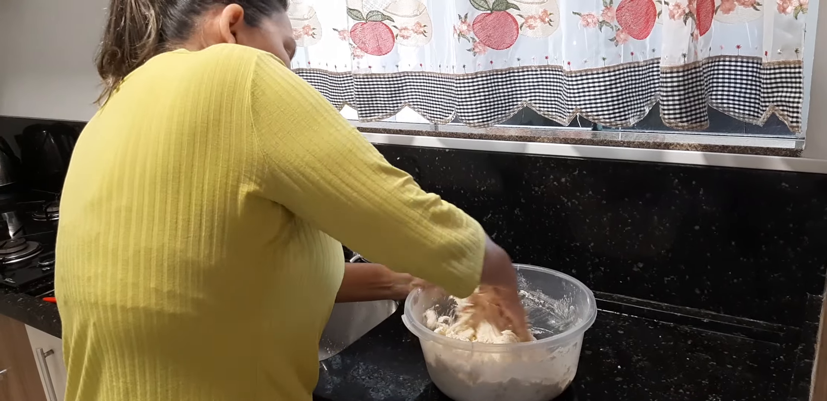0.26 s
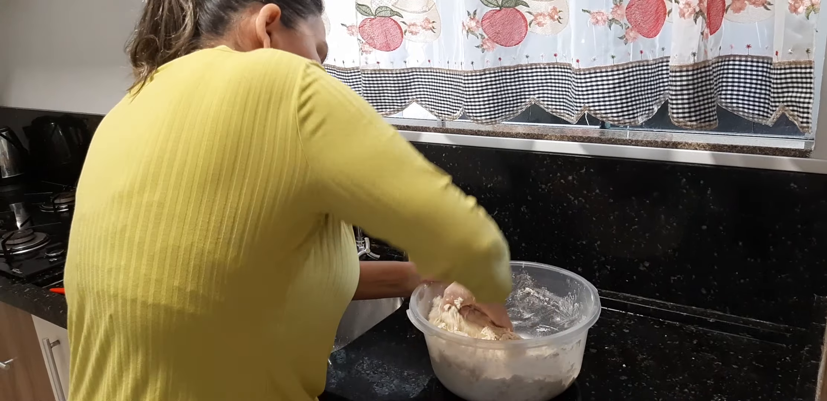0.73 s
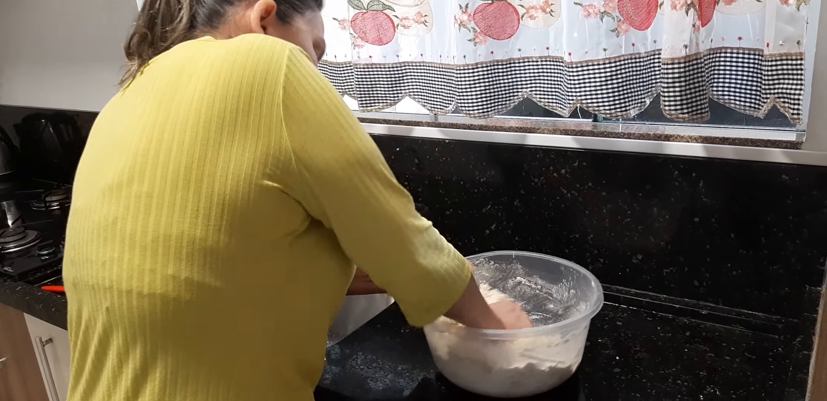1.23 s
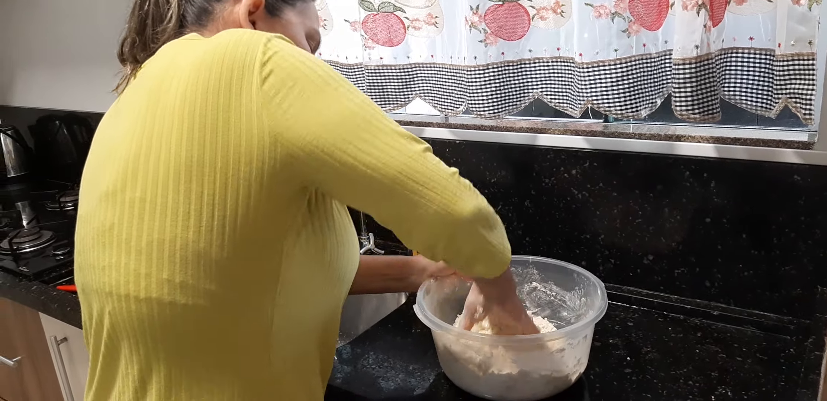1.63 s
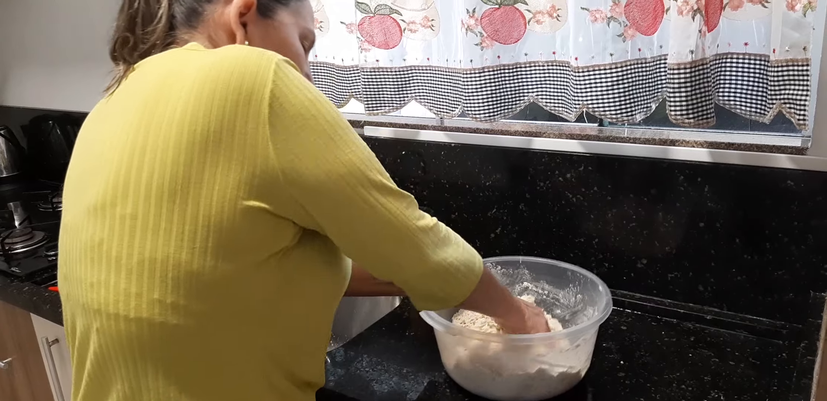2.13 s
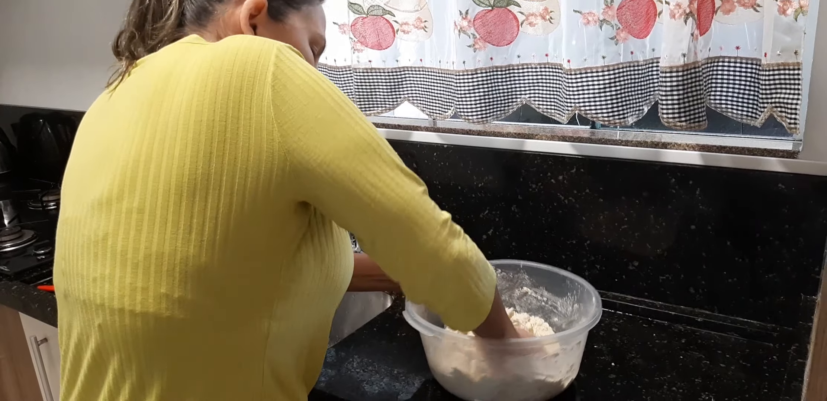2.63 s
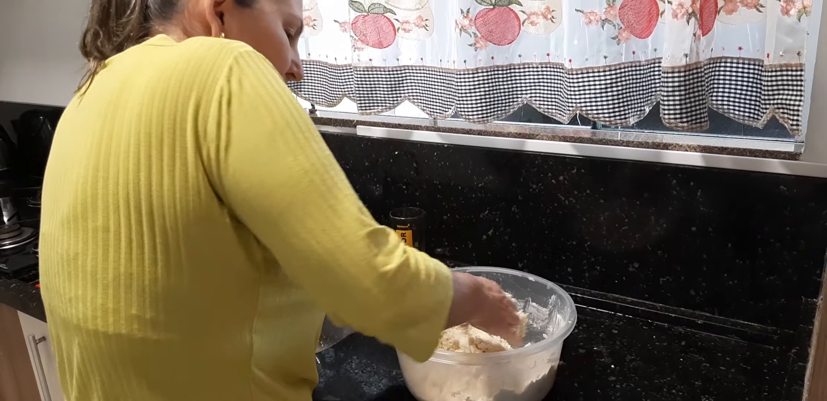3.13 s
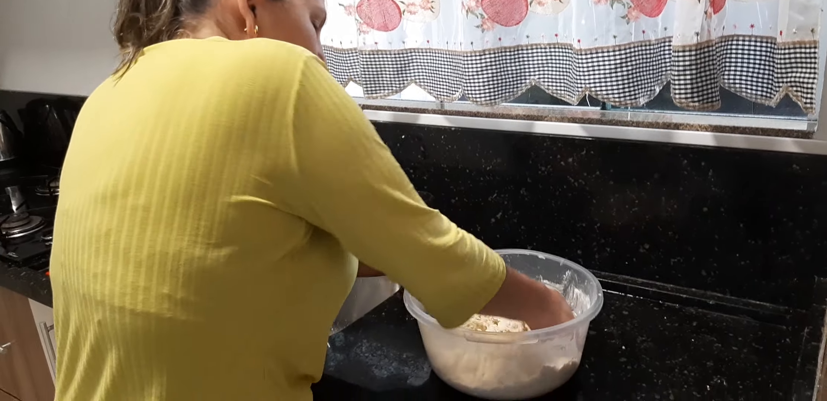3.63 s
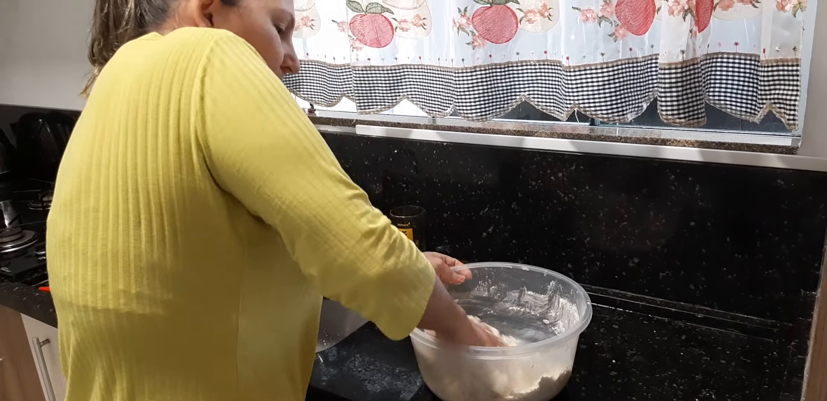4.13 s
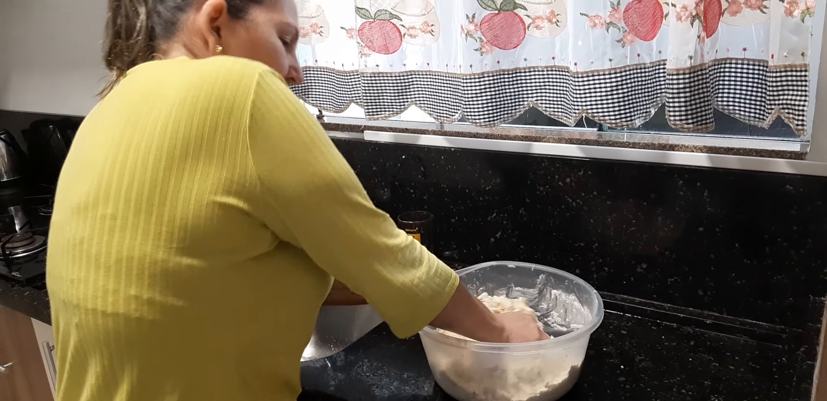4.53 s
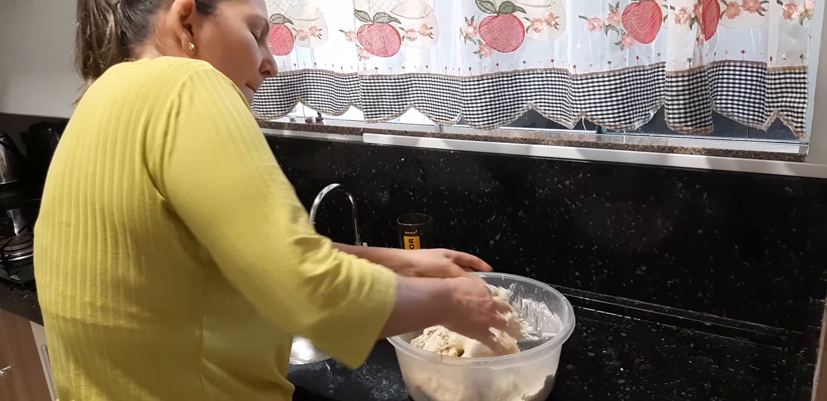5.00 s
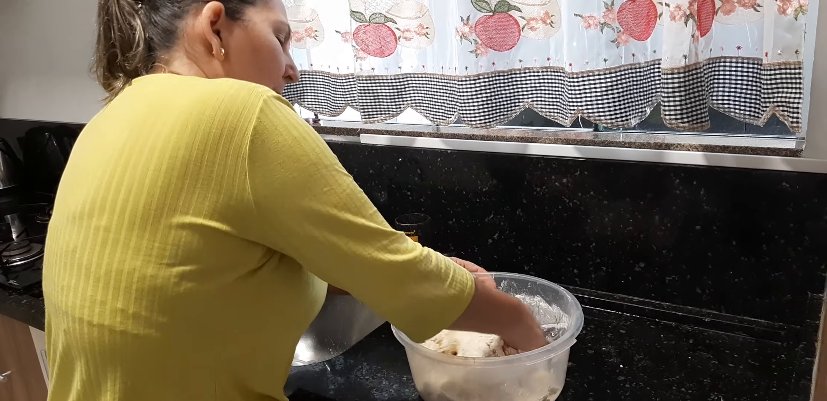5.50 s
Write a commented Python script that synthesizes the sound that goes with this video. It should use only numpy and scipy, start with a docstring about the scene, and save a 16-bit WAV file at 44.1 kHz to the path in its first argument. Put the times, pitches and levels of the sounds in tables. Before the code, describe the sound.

Crumbly dough is rubbed and pressed in a plastic bowl in irregular gritty strokes, some dull, some bright and hissing. Knuckles and lumps tap the wall now and then, with the sharpest clatter just after five seconds. A small home kitchen gives short echoes; low rumble, faint hum and hiss lie beneath. Close stereo microphone, treble leaning left.

```python
"""A dense gritty hiss comes and goes as hands knead crumbly dough in a plastic bowl in a quiet kitchen.
Each stroke drags crumbs along the wall: showers of random slips, shaped by hand pressure and speed.
Knuckles and lumps knock the bowl now and then, each a crack and some decaying modes; a few high ticks ring.
Behind it: shaped noise for the room's rumble and hiss, a mains hum and one thin whine, as wavering sines.
A close pair of microphone ports hears it all, with short echoes from the kitchen."""
import sys
import numpy as np
from scipy import signal
from scipy.fft import rfft, irfft, next_fast_len
from scipy.io import wavfile
from scipy.ndimage import uniform_filter1d

SR = 44100
rng = np.random.default_rng(int(sys.argv[2]) if len(sys.argv) > 2 else 0)


def output_pcm(signal):
    """Save a mono or channel-first signal as 16-bit PCM at the path in sys.argv[1].

    Samples are clipped to [-1, 1] before scaling.
    """
    pcm = np.clip(np.atleast_2d(signal).T, -1, 1) * 32767
    wavfile.write(sys.argv[1], SR, np.round(pcm).astype(np.int16))


def convert_level_to_amplitude(level_db):
    """Map a level in decibels to its linear amplitude factor."""
    exponent = np.asarray(level_db, float) / 20
    return 10 ** exponent


N = 253883  # samples

# Strokes of the hand, dull pushes and fast bright sweeps:
# (full pressure at [s], rise [s], hold [s], fall [s], pressure [dB], speed as extra flour level [dB])
HAND_STROKES = [(0, .1, 0.015, .15, -50.5, -6), (0.126, .1, .01, 0.31, -61, -12),
                (0.313, .03, 0.018, .1, -74, 6), (0.392, .01, .02, .1, -62, -12),
                (0.428, .04, .02, 0.14, -54.5, -8), (0.554, 0.17, 0.06, 0.23, -49.5, 1.5),
                (0.72, 0.092, .01, 0.88, -59, -9), (1.12, 0.23, 0.089, .1, -52.5, 1.5),
                (1.223, 0.16, 0.086, 0.074, -46.5, -4.5), (1.368, .1, .11, 0.19, -53, -13),
                (1.76, 0.094, 0.087, .1, -65.5, -6), (1.93, 0.13, 0.034, 0.088, -57.5, 5.5),
                (1.974, 0.086, 0.032, 0.11, -49.5, -7), (2.045, 0.12, 0.033, 0.14, -48, -4.5),
                (2.15, .1, 0.13, 0.29, -57, -8.5), (2.48, .3, 0.068, 0.16, -61.5, -10),
                (2.689, 0.086, 0.23, .2, -51.5, -10), (3.03, 0.26, 0.074, 0.18, -49, 0),
                (3.307, .012, .1, .2, -54, -17), (3.432, 0.11, 0.12, .2, -48.5, -8.5),
                (3.604, 0.35, 0.095, 0.18, -45.5, -0.5), (3.754, 0.15, 0.032, 0.29, -43, -3),
                (3.94, 0.15, 0.04, 0.56, -56, -11), (4.245, 0.48, .05, .1, -57.5, -7),
                (4.352, 0.084, 0.067, 0.27, -49, -0.5), (4.42, 0.21, .2, 0.27, -48, -4.5),
                (4.773, 0.26, .17, 0.19, -54.5, -7), (5.152, .008, 0.049, .1, -51.5, -20),
                (5.202, 0.087, 0.14, .2, -47.5, -6.5), (5.393, 0.27, 0.093, .2, -47.5, 3),
                (5.57, .2, 0.059, 0.24, -44.5, -1)]
# Colour of crumbs on the wall: (frequency [Hz], relative level [dB])
CRUMB_COLOUR = [(1200, -22.5), (1800, -9.5), (3000, -3), (4200, -1), (5500, -4.5), (7000, -9), (7800, -15),
                (9000, -65)]
# Colour of fine flour: (frequency [Hz], relative level [dB])
FLOUR_COLOUR = [(4000, -13), (5500, 9), (7000, 8.5), (7700, 1), (8500, 0.5), (10000, -0.5), (12000, 6),
                (13500, 3.5), (14500, 3.5), (16000, -0.5)]
# Colour of the bowl shaken on the counter: (frequency [Hz], relative level [dB])
BOWL_COLOUR = [(120, -20), (250, -7), (450, -1), (750, -8), (1300, -2), (1800, -4.5), (2500, -54)]
# Colour of the wall's answer to dry crust: (frequency [Hz], relative level [dB])
RASP_COLOUR = [(1500, -20), (1900, -4), (2200, -1), (2450, 0), (2700, -2.5), (3100, -23.5)]

# Rumble and hiss of the room: (frequency [Hz], relative density [dB per Hz])
ROOM_RUMBLE = [(20, -34), (35, -25), (59, -1), (72, -6), (90, -10.5), (105, -15), (124, 0), (174, -2.5),
               (295, -2), (520, -11), (700, -13.5), (1500, -24.5), (2300, -15), (3000, -26)]
# Its treble, with the broad bands of an appliance: (frequency [Hz], relative density [dB per Hz])
ROOM_TREBLE = [(3700, -21.5), (4500, -28), (6500, -31), (7200, -32), (8100, -52), (10000, -37.5),
               (11300, -27.5), (12000, -28), (12900, -33), (13400, -36), (16000, -40)]
# Standing waves and a hiss band, ahead of the port colour: (centre [Hz], width [Hz], level [dB rms])
STANDING_WAVES = [(126, 24, -71.5), (204.2, 15, -67), (286, 37, -71), (508, 14, -73.5), (3740, 180, -72)]
# Mains hum, ahead of the port colour:
# (frequency [Hz], central level [dB rms], waver [Hz], left over right [dB])
MAINS_HUM = [(58.8, -69, 1.9, 3.5), (118.5, -71.5, 3.2, 0)]
# One thin whine, ahead of the port colour:
# (frequency [Hz], central level [dB rms], waver [Hz], left over right [dB])
THIN_WHINE = (3626, -75, 1.5, 5)

# Die-away of the kitchen: (frequency [Hz], t60 [s])
KITCHEN_DECAY = [(200, 0.32), (1000, 0.39), (4000, 0.31), (12000, 0.22)]
# Reflections off counter, tiles, window: (delay [s], level [dB])
NEAR_SURFACES = [(.0085, -11), (.015, -14), (.023, -15)]
# Small high ticks and squeaks: (time [s], starting level [dB], frequency [Hz], t60 [s])
HIGH_TICKS = [(.3055, -52, 4950, 0.032), (3.583, -46, 4000, .03), (3.603, -51, 4400, 0.039),
              (3.621, -41.5, 4310, 0.052), (3.636, -48, 4210, .04)]
# Knocks on the bowl:
# (time [s], level [dB], pitch of the struck spot [Hz], lower wall [dB re knock], whole bowl [dB re knock])
BOWL_KNOCKS = [(0.388, -47.5, 2370, -4, -18), (0.424, -48.5, 2550, -11, -4), (1.134, -41, 2500, -7, -12),
               (1.262, -38.5, 2700, -12, -18), (2.531, -53.5, 2400, -3.5, 9), (2.999, -42, 2226, -12, -20),
               (3.31, -52.5, 2350, 4, -15), (3.315, -43, 2500, -6, -0.5), (3.315, -42, 2130, 1.5, -20),
               (3.326, -40, 2050, -23, -17), (3.333, -38.5, 2100, -23, -10), (3.529, -43, 2700, -4, -0.5),
               (4.047, -41.5, 2380, -13, -3.5), (4.215, -46.5, 2460, -6.5, 1.5),
               (4.793, -42, 2460, -18, -14), (5.144, -35, 2350, -16.5, -14), (5.147, -38, 2390, -10, -19),
               (5.152, -36.5, 2070, -8, -15), (5.159, -36, 1990, -16, -15), (5.188, -36.5, 1960, -12, -3.5)]
# Struck spot: (multiple of its pitch [ratio], level [dB re knock], t60 [s])
SPOT_MODES = [(1, 1, 0.024), (1.07, -20, 0.022), (1.9, -8.5, .012)]
# Lower wall: (frequency [Hz], level [dB re its share], t60 [s])
LOWER_WALL_MODES = [(1130, -5, 0.0072), (1310, 5.5, 0.019), (1530, 1, 0.026)]
# Whole bowl: (frequency [Hz], level [dB re its share], t60 [s])
WHOLE_BOWL_MODES = [(217, -18, 0.028), (404, -1.5, 0.044), (500, 3, 0.029)]

# How alike the two ports hear the rubbing, echoes and room noise: (frequency [Hz], likeness [0 to 1])
PORT_LIKENESS = [(60, 0.92), (250, 0.93), (500, 0.79), (700, 0.53), (1150, 0.42), (1600, 0.07),
                 (1900, 0.031), (2450, 0.62), (2900, 0.094), (6000, 0.017), (6700, 0.056), (7200, 0.057),
                 (16000, 0.048)]
# The ports differ in colour: (frequency [Hz], left over right [dB])
PORT_COLOUR = [(60, 0), (200, 1.5), (600, 1), (1200, 4), (2200, 0), (3000, 0.5), (4000, 5.5), (5300, 0.5),
               (6300, 3.5), (7500, 11), (9000, 10.5), (11300, 10), (12500, 5), (14000, -1), (15500, 6)]

SWING_DB = 20  # gained over the rise and lost over the fall
FIRM_DB = -48  # pressure of a firm stroke
BOWL_DB, BOWL_FOLLOWS = -8, 0.73  # bowl under a firm stroke; how far it follows the pressure
RASP_DB, RASP_FOLLOWS = -5, 0.88  # the same for the rasp of dry crust
FLOUR_STEEPER, FLOUR_LEAD_S = 1.45, 0.004  # flour rises and falls faster, and a little earlier
CRACK_DB = -9  # crack of a knock, against the lower wall's share
ROOM_DB = -56  # rms of the broad room noise, ahead of the port colour
EDGE_HZ = 15770  # top of the recorded band


def evened(x):
    """Scales to an rms of 1 over all channels."""
    return x / np.sqrt(np.mean(x ** 2) + 1e-20)


def read(points, hz):
    """Reads a curve between its points, along log frequency."""
    f, value = np.transpose(points)
    return np.interp(np.log(hz + 1), np.log(f + 1), value)


def add(mix, start_s, sound):
    """Lays a sound into the mix in place, cut off at the end."""
    part = mix[round(start_s * SR):][:len(sound)]
    part += sound[:len(part)]


def coloured(x, gain):
    """Filters by a gain given as a function of frequency."""
    size = next_fast_len(N)
    spectrum = rfft(x, size)
    return irfft(spectrum * gain(np.fft.rfftfreq(size, 1 / SR)), size)[..., :N]


def slow(per_s, channels=1):
    """Slow random drift of spread 1: noise smoothed twice over 1 / per_s seconds."""
    width = max(round(SR / per_s), 1)
    once = uniform_filter1d(rng.standard_normal((channels, N)), width)
    return evened(uniform_filter1d(once, width))


def ported(pair):
    """The right port hears a share of the left signal and a part of its own, by frequency."""
    def same(hz):
        return np.clip(read(PORT_LIKENESS, hz), 0, 1)

    def own(hz):
        return np.sqrt(1 - same(hz) ** 2)

    left = pair[0]
    right = coloured(left, same) + coloured(pair[1], own)
    return np.array([left, right])


def slopes_db(t, full_s, rise_s, hold_s, fall_s):
    """Zero while the stroke holds, falling evenly in dB before and after."""
    before = (full_s - t) / rise_s
    after = (t - full_s - hold_s) / fall_s
    return -SWING_DB * np.maximum(np.maximum(before, after), 0)


def together(levels_db):
    """Level of several overlapping strokes, added as power."""
    return 10 * np.log10(sum(convert_level_to_amplitude(db) ** 2 for db in levels_db) + 1e-12)


def stroke_levels():
    """Pressure and flour levels [dB] over time; a speed above 0 dB lifts the flour, below dulls it."""
    t = np.arange(0, N, 32) / SR
    pressure, flour = [], []
    for *shape, db, speed_db in HAND_STROKES:
        pressure.append(db + slopes_db(t, *shape))
        flour.append(db + speed_db + FLOUR_STEEPER * slopes_db(t + FLOUR_LEAD_S, *shape))
    every = np.arange(N) / SR
    return np.interp(every, t, together(pressure)), np.interp(every, t, together(flour))


def grains(spectrum, per_s, spread_db):
    """Many small slips of uneven size and random sign, coloured, at an rms of 1."""
    size_db = spread_db * np.minimum(rng.exponential(1, (2, N)), 3)
    slips = convert_level_to_amplitude(size_db) * rng.choice([-1., 1.], (2, N))
    slips = slips * (rng.random((2, N)) < per_s / SR)
    return evened(coloured(slips, lambda hz: convert_level_to_amplitude(read(spectrum, hz))))


def strokes():
    """Pressure drives all layers; speed brightens, bowl and rasp follow the pressure only in part."""
    pressure_db, flour_db = stroke_levels()

    def partly(db, follows):
        return convert_level_to_amplitude(FIRM_DB + db + follows * (pressure_db - FIRM_DB))

    grit = convert_level_to_amplitude(pressure_db) * grains(CRUMB_COLOUR, per_s=11000, spread_db=2.0)
    flour = convert_level_to_amplitude(flour_db) * grains(FLOUR_COLOUR, per_s=20000, spread_db=1.0)
    bowl = partly(BOWL_DB, BOWL_FOLLOWS) * grains(BOWL_COLOUR, per_s=3000, spread_db=3.5)
    catching = convert_level_to_amplitude(1.05 * slow(24))  # crust catches unevenly
    rasp = partly(RASP_DB, RASP_FOLLOWS) * catching * grains(RASP_COLOUR, per_s=1100, spread_db=3.5)
    clumps = convert_level_to_amplitude(0.6 * slow(80))  # crumbs pass in clumps
    return clumps * (grit + flour + bowl + rasp)


def room_noise():
    """Smooth rumble and hiss with a few standing waves: random noise shaped by frequency."""
    def broad(hz):
        return convert_level_to_amplitude(read(ROOM_RUMBLE + ROOM_TREBLE, hz))

    out = convert_level_to_amplitude(ROOM_DB) * evened(coloured(rng.standard_normal((2, N)), broad))
    for centre, width, db in STANDING_WAVES:
        def peak(hz):
            return 1 / (1 + (2 * (hz - centre) / width) ** 2)

        out += convert_level_to_amplitude(db) * evened(coloured(rng.standard_normal((2, N)), peak))
    return ported(out)


def hum_and_whine():
    """Steady sines whose pitch and level waver slowly, each leaning to one port or centred."""
    out = np.zeros((2, N))
    for hz, db, waver_hz, left_db in MAINS_HUM + [THIN_WHINE]:
        turns = np.cumsum(hz + waver_hz * slow(5.83)[0]) / SR
        lean_db = np.array([[.5], [-.5]]) * left_db
        level = convert_level_to_amplitude(db + 1.5 * slow(8)[0] + lean_db)
        out += level * np.sqrt(2) * np.sin(2 * np.pi * (turns + rng.random()))
    return out


def echoes():
    """Sparse echoes of random sign, each band dying at its own speed."""
    length, first, spacing = SR // 2, 200, 20  # samples
    taps = np.zeros((2, length))
    at = np.arange(first, length - spacing, spacing)
    at = at + rng.integers(0, spacing, (2, len(at)))
    np.put_along_axis(taps, at, rng.choice([-1., 1.], at.shape), 1)
    hz, t, bands = signal.stft(taps, SR, nperseg=256)
    decay = convert_level_to_amplitude(-60 * t / read(KITCHEN_DECAY, hz)[:, None])
    tail = signal.istft(bands * decay, SR, nperseg=256)[1]
    return tail / np.linalg.norm(tail[0])


def kitchen(x, count=10, turns_per_s=1.6):
    """The sound fades steadily round a circle of echo patterns, so no fixed tones stand out."""
    turn = np.arange(N) / SR * turns_per_s
    out = np.zeros((2, N))
    for k in range(count):
        away = abs((turn - k / count + .5) % 1 - .5) * count  # from the centre of pattern k
        share = np.cos(np.pi / 2 * np.minimum(away, 1))
        out += signal.fftconvolve(x * share, echoes(), axes=1)[:, :N]
    return out


def ring(hz, db, t60, rise=0.00028):
    """One struck mode: a sine with a soft onset (rise [s]) and an exponential decay."""
    t = np.arange(round(.15 * SR)) / SR
    return convert_level_to_amplitude(db - 60 * t / t60) * np.sin(2 * np.pi * hz * t) * (1 - np.exp(-t / rise))


def ticks():
    """Small high ticks and squeaks, each a single ringing mode."""
    out = np.zeros(N)
    for start_s, db, hz, t60 in HIGH_TICKS:
        add(out, start_s, ring(hz, db, t60, rise=0.00056))
    return out


def knocks():
    """Each blow cracks, rings the struck spot and the lower wall briefly and the whole bowl dully."""
    out = np.zeros(N)
    t = np.arange(400) / SR
    for start_s, db, hz, wall_db, dull_db in BOWL_KNOCKS:
        noise = np.diff(uniform_filter1d(rng.standard_normal(400), size=4), prepend=0)
        add(out, start_s, convert_level_to_amplitude(db + wall_db + CRACK_DB - 60 * t / 0.015) * noise)
        for multiple, mode_db, t60 in SPOT_MODES:
            add(out, start_s, ring(hz * multiple, db + mode_db, t60))
        for mode_hz, mode_db, t60 in LOWER_WALL_MODES:
            add(out, start_s, ring(mode_hz, db + wall_db + mode_db, t60))
        for mode_hz, mode_db, t60 in WHOLE_BOWL_MODES:
            add(out, start_s, ring(mode_hz, db + dull_db + mode_db, t60, rise=0.001))
    return out


def near_reflections(direct):
    """Adds one delayed, softer copy for each of the surfaces close by."""
    thrown = direct.copy()
    for delay_s, db in NEAR_SURFACES:
        add(thrown, delay_s, convert_level_to_amplitude(db) * direct)
    return thrown


def scene():
    """Blows reach both ports alike; rubbing and kitchen echoes differ between them."""
    rub = strokes()
    blows = near_reflections(ticks() + knocks()) * np.ones((2, 1))
    room_echo = kitchen(convert_level_to_amplitude(-9) * rub + convert_level_to_amplitude(-4) * blows)
    return blows + ported(rub + room_echo) + room_noise() + hum_and_whine()


def roll_off(x):
    """The treble ends steeply here."""
    return signal.sosfilt(signal.butter(12, 16260, fs=SR, output="sos"), x)


def record(dry):
    """The two microphone ports differ in colour; the band ends sharply."""
    def port_gain(hz):
        colour = convert_level_to_amplitude(np.array([[.5], [-.5]]) * read(PORT_COLOUR, hz))
        return colour * np.clip((EDGE_HZ - hz) / 40, 0, 1)  # closes over the last 40 Hz

    mix = coloured(dry, port_gain)
    return roll_off(mix)


dry = scene()
out = record(dry)
output_pcm(out)
```